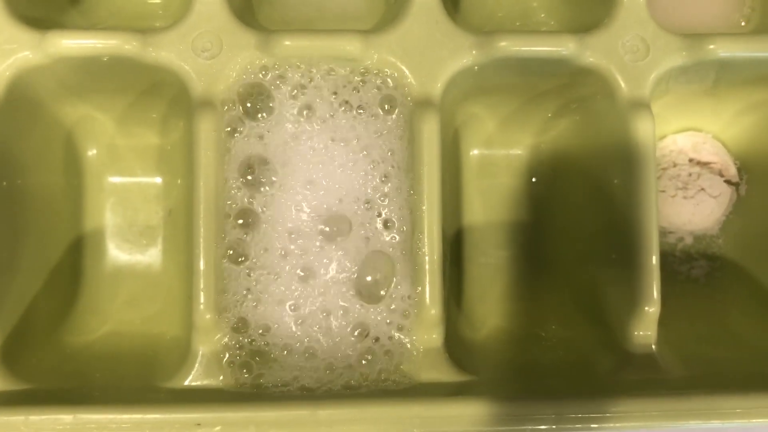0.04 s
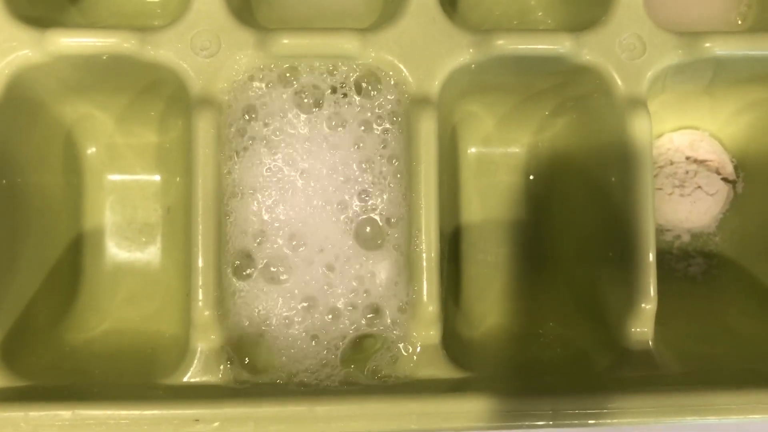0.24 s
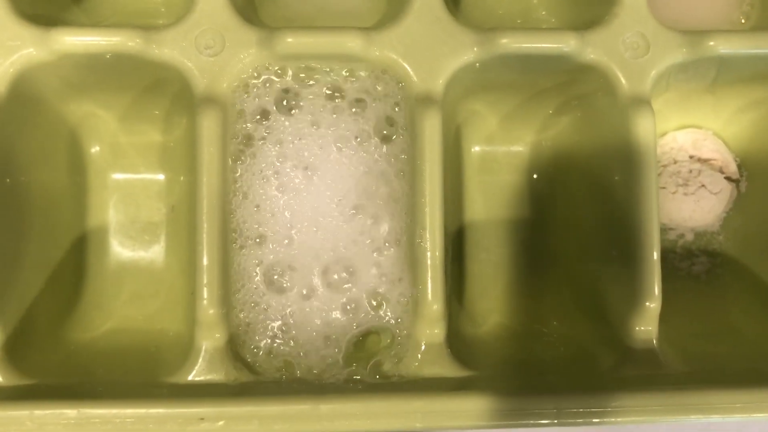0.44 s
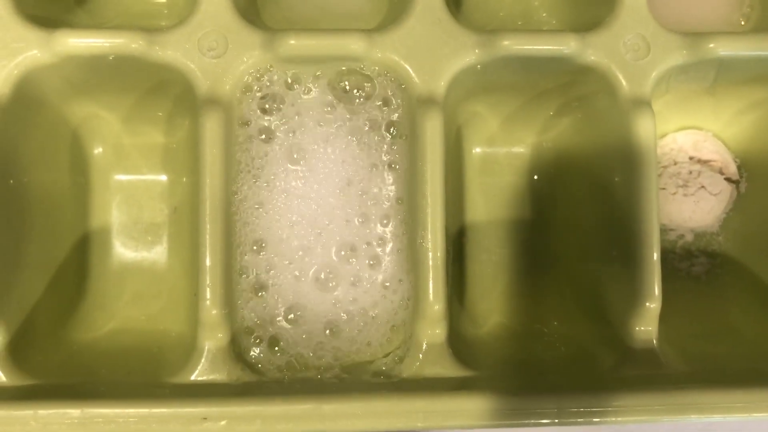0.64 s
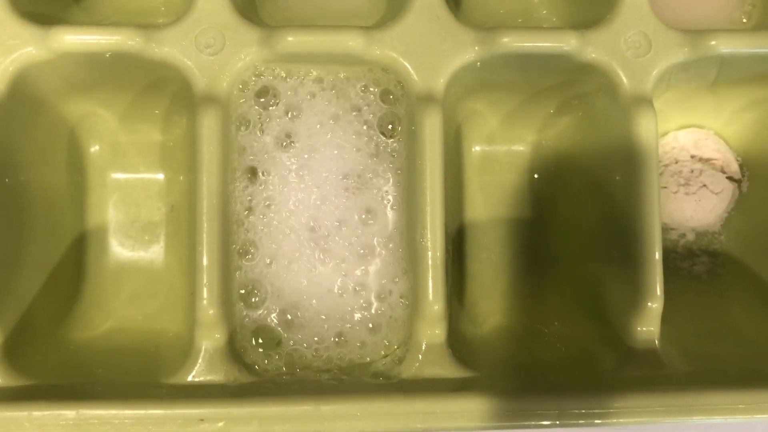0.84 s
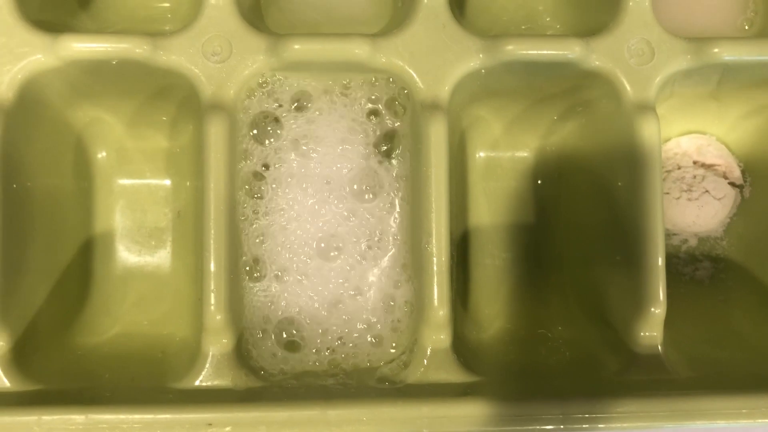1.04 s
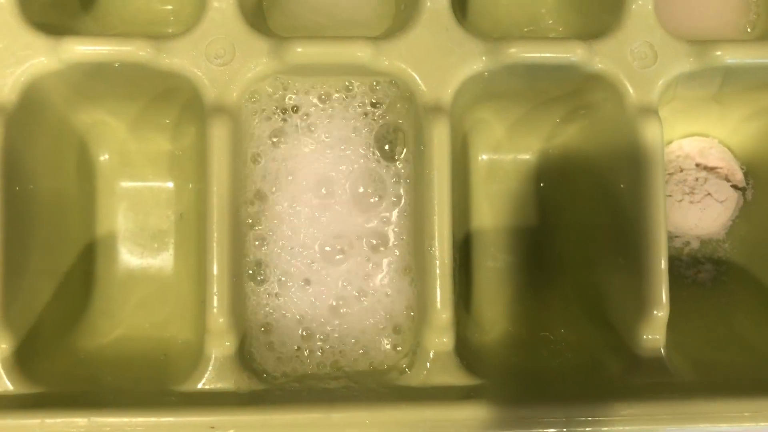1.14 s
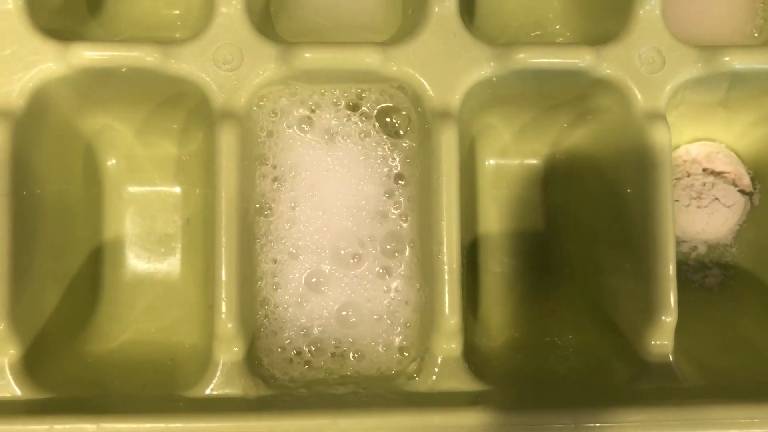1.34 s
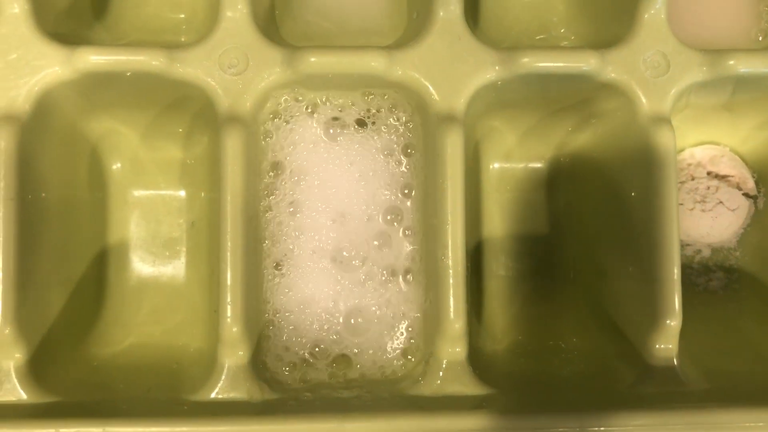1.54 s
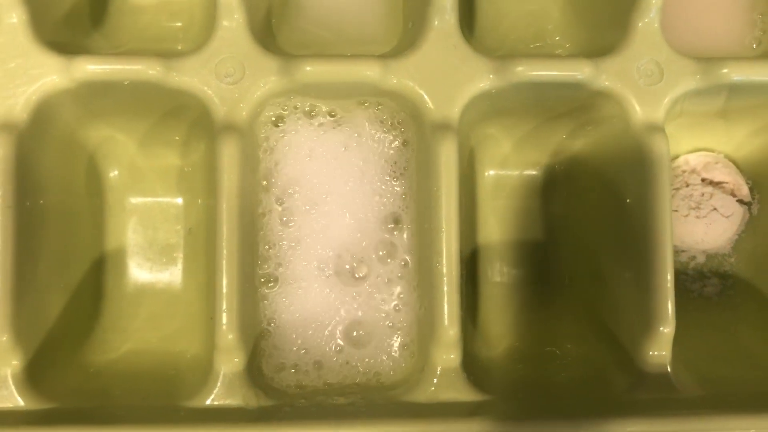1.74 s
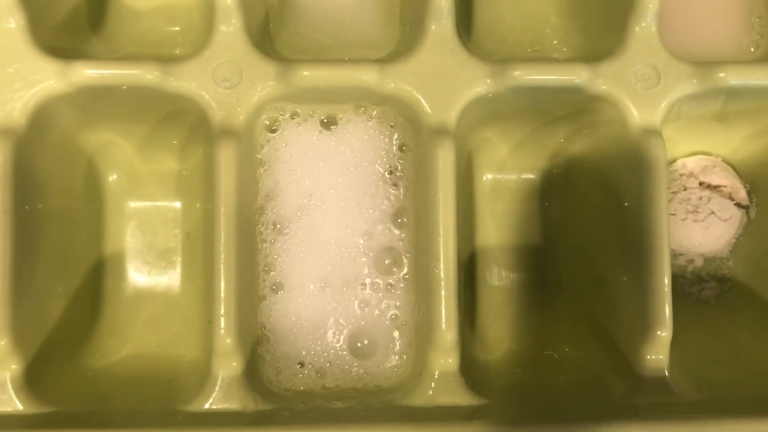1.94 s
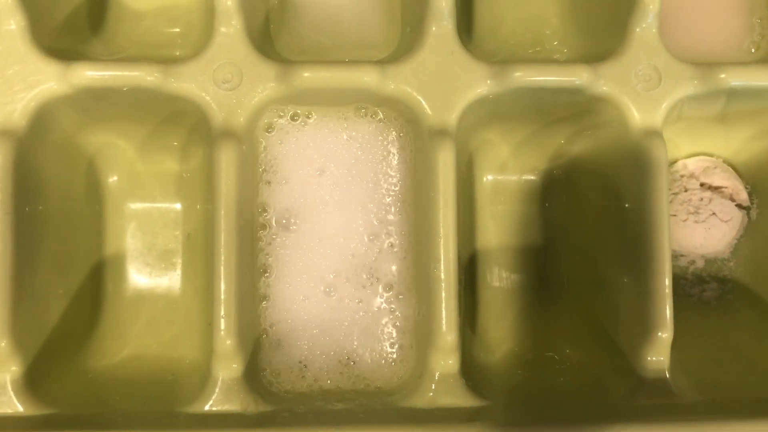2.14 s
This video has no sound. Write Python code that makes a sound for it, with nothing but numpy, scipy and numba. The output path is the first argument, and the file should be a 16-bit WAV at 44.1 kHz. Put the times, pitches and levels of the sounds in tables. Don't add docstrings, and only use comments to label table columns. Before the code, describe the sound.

Foam fizzes continuously in a small plastic tray well, tiny bubbles bursting very close to the microphone; early on a stick hits the tray sharply, then rattles softly, over faint indoor room air and hum.

```python
import sys
import numpy as np
from scipy import signal
from scipy.fft import rfft, irfft
from scipy.io import wavfile
from scipy.ndimage import uniform_filter1d
from numba import njit

SR = 44100
rng = np.random.default_rng(int(sys.argv[2]) if len(sys.argv) > 2 else 0)


def output_pcm(signal):
    pcm = np.clip(np.atleast_2d(signal).T, -1, 1) * 32767
    wavfile.write(sys.argv[1], SR, np.round(pcm).astype(np.int16))


def convert_level_to_amplitude(level_db):
    exponent = np.asarray(level_db, float) / 20
    return 10 ** exponent


N = 97020

# frequency in Hz, rms level in dB, wobble in dB.
HUM_TONES = [(56.6, -61, .2), (169, -77, 1), (274, -75, 1)]
# centre in Hz, width in Hz, rms level in dB.
HOUSING_DRONE = [(173, 31, -72), (267, 11, -72)]
# frequency in Hz, level in dB.
AIR_COLOUR = [(45, -19), (70, -3), (95, -6), (130, -1), (340, -1), (420, -7), (650, 0), (850, -10)]
# time in seconds, level in dB.
DRAUGHT_LEVEL = [
    (0, -58),
    (0.12, -65),
    (0.3, -62),
    (1.2, -65.5),
    (1.4, -81),
    (2.0, -78),
    (2.2, -61),
]
# start in seconds, peak in dB, frequency in Hz, decay T60 in seconds.
SOFT_BUMPS = [(1.274, -53, 320, .035), (1.279, -48, 195, .04), (1.285, -50, 145, .04),
              (2.0055, -44, 200, .05), (2.003, -49, 290, .05), (2.012, -46, 140, .06),
              (2.011, -49, 350, .05), (0.387, -53, 1180, .04), (1.14, -56, 550, .04), (0.336, -56, 345, .1),
              (1.535, -54, 170, .08)]
# frequency in Hz, level in dB, decay T60 in seconds.
TRAY_MODES = [(617, -7, 0.029), (744, -10, 0.018), (1085, -13, 0.026), (1536, -9, 0.017),
              (1815, -12.5, 0.016), (2167, -7.5, 0.012), (2635, -2.5, 0.01), (2790, -4, 0.014),
              (4160, -5.5, 0.012), (4570, -9.5, 0.012), (5190, -5.5, 0.0099), (5710, -9, 0.016),
              (9450, -4, 0.011), (12210, -6.5, .015)]
# frequency in Hz, level in dB, decay T60 in seconds.
HARD_STICK_MODES = [(1712, -21, .09), (2245, -21, .08), (3166, -3.5, .075), (4214, -16, .08),
                    (4420, -19, .05), (5170, -12, .1), (7228, -17, .11), (7456, -5.5, .11),
                    (9395, -16, .12), (12250, -16, .06), (13065, -5, .09), (13575, -8, .06),
                    (13745, -9, .08), (13815, -7, .09)]
# frequency in Hz, level in dB, decay T60 in seconds.
SOFT_STICK_MODES = [(1790, -5, .08), (2050, -12, .1), (2625, 0, .03), (3760, -7, .03), (4200, -6, .03),
                    (4637, 2, .05), (5030, -1, .035), (5175, -2, .055), (6100, -4, .015), (9062, -3.5, .2),
                    (13070, -20, .08), (14310, -18, .1)]
# start in seconds, ring level in dB, knock level in dB.
HARD_CONTACTS = [
    (0.2073, -21.5, -18.5),
    (0.2575, -50, -48),
]
# start in seconds, ring level in dB, knock level in dB.
SOFT_CONTACTS = [
    (0.4254, -35, -31),
    (0.4312, -47, -39),
    (0.4365, -44, -37),
    (0.4395, -52, -41),
    (0.4415, -54, -42),
    (0.451, -58, -46),
    (0.4735, -62, -44),
    (0.4758, -56, -38),
    (0.482, -59, -40),
    (0.485, -62, -41),
]
# start in seconds, peak in dB, frequency in Hz, decay T60 in seconds.
FREE_END_RINGS = [
    (0.25, -52, 3165, .12),
    (0.29, -57, 3180, .3),
    (0.233, -46, 7445, .35),
    (0.233, -47, 7478, .35),
    (0.232, -50, 5170, .2),
    (0.235, -52, 2200, .15),
    (0.228, -54, 13810, .25),
    (0.445, -56, 4635, .3),
    (0.452, -50, 1950, .1),
    (0.458, -53, 2150, .08),
]
# time in seconds, fizz level in dB, ringing of the well in dB.
FOAM_STATE = [
    (0.0, -47.5, -6.5),
    (0.451, -49.5, -4.5),
    (0.7, -48.5, -6),
    (1.1, -49, -5.5),
    (1.7, -49, -5),
    (2.2, -49.5, -1.5),
]
# frequency in Hz, level in dB.
FIZZ_COLOUR = [(600, -15), (1600, -8.5), (2800, -3.5), (4600, -0.5), (7000, 0), (10000, 0.5), (13000, -3),
               (16000, -2)]
# frequency in Hz, width in Hz, level in dB.
WELL_MODES = [(1184, 247, 13.5), (2110, 410, -4), (3540, 650, 4), (8530, 430, -11.5), (11400, 380, -9),
              (13200, 670, 1.5), (15300, 550, -5.5)]
# start in seconds, peak in dB, frequency in Hz.
LARGE_BUBBLES = [(0.647, -41, 4000), (1.073, -38, 7000), (1.22, -40, 5800), (0.5338, -39, 3910),
                 (0.7143, -39, 3770), (1.8123, -38, 6000), (1.914, -41, 3700), (1.886, -46, 1200),
                 (1.5425, -37, 4030), (1.545, -39, 3900), (1.728, -41, 3700), (2.024, -39, 6200)]


def level(x, db):
    return x * convert_level_to_amplitude(db) / np.sqrt(np.mean(x ** 2))


def band(x, hz, width_hz):
    return signal.lfilter(*signal.iirpeak(min(hz, .45 * SR), hz / width_hz, fs=SR), x)


def high_pass(x, order, hz):
    return signal.sosfilt(signal.butter(order, hz, "high", fs=SR, output="sos"), x)


def colour(x, points):
    f = np.maximum(np.arange(N // 2 + 1) * SR / N, 1)
    hz, db = np.array(points).T
    low_edge = np.minimum(f / hz[0], 1) ** 2
    return irfft(rfft(x) * low_edge * convert_level_to_amplitude(np.interp(np.log(f), np.log(hz), db)), N)


def walk(rate):
    k = int(SR / rate)
    steps = np.repeat(rng.standard_normal(N // k + 1), k)
    drift = uniform_filter1d(uniform_filter1d(steps, k), k)[:N]
    return (drift - drift.mean()) / drift.std()


def envelope(times, db):
    return convert_level_to_amplitude(np.interp(np.arange(N) / SR, times, db))


@njit
def grains(count, start, hz, t60, size, glide):
    y = np.zeros(count)
    for k in range(len(start)):
        first = int(start[k] * SR)
        n = int(t60[k] * SR) + 2
        fade = np.exp(-np.log(1000.) / n)
        rise = (1 + glide) ** (3 / n)
        phase, step, a = 0., 2 * np.pi * hz[k] / SR, size[k]
        for i in range(first, min(first + n, count)):
            y[i] += a * np.sin(phase)
            phase += step
            step = min(step * rise, 2.9)
            a *= fade
    return y


def room_air():
    air = signal.lfilter(*signal.butter(2, 1100, fs=SR), rng.standard_normal(N))
    return level(colour(air, AIR_COLOUR), -62) * convert_level_to_amplitude(0.7 * walk(1.06))


def draught():
    times, db = np.array(DRAUGHT_LEVEL).T
    murmur = band(rng.standard_normal(N), 455, width_hz=320)
    return level(murmur, 0) * envelope(times, db)


def motor():
    t = np.arange(N) / SR
    out = np.zeros(N)
    for hz, db, wobble_db in HUM_TONES:
        out += np.sqrt(2) * convert_level_to_amplitude(db + wobble_db * walk(5.5)) * np.sin(2 * np.pi * hz * t)
    for hz, width_hz, db in HOUSING_DRONE:
        out += level(band(rng.standard_normal(N), hz, width_hz), db)
    return out


def bumps():
    start, db, hz, t60 = np.array(SOFT_BUMPS).T
    return high_pass(grains(N, start, hz, t60, convert_level_to_amplitude(db), -.25), 3, 95)


def room(x):
    t = np.arange(SR // 2) / SR
    t60_s, onset_s = .25, 0.0025
    tail = rng.standard_normal(len(t)) * convert_level_to_amplitude(-60 * t / t60_s) * np.minimum(t / onset_s, 1)
    tail = signal.lfilter(*signal.butter(1, 3000, fs=SR), tail)
    return signal.fftconvolve(x, tail / np.sqrt(np.sum(tail ** 2)))[:N] * convert_level_to_amplitude(-15)


def stick_ring(t, modes, db):
    hz, mode_db, t60 = np.array(modes).T
    ring = grains(len(t), .0006 * rng.random(len(hz)), hz, t60, convert_level_to_amplitude(mode_db + db), 0.)
    settle = np.exp(np.clip((.023 - t) / 0.0036, -50, 50))
    return ring * convert_level_to_amplitude(-15 / (1 + settle))


def tray_knock(t, db, scatter_db, detune, dull_hz, thin_hz):
    hz, mode_db, t60 = np.array(TRAY_MODES).T
    chance, delay, pitch = rng.random((len(hz), 3)).T
    dull = 1 / (1 + (hz / dull_hz) ** 4) / (1 + (thin_hz / hz) ** 4)
    sign = (-1.) ** np.arange(len(hz))
    size = sign * dull * convert_level_to_amplitude(mode_db + db + scatter_db * (2 * chance - 1.5))
    knock = grains(len(t), .0003 * delay, hz * (1 + detune * (pitch - .5)), t60, size, 0.)
    crack_s = 0.0026
    crack = rng.standard_normal(len(t)) * t / crack_s * np.exp(-2 * t / crack_s) * 5
    return knock + convert_level_to_amplitude(db - 2.5) * band(crack, 4060, width_hz=3500)


def taps(contacts, modes, low_hz, **blow):
    out, t = np.zeros(N), np.arange(SR // 4) / SR
    for start, ring_db, knock_db in contacts:
        i = int(start * SR)
        out[i:i + len(t)] += stick_ring(t, modes, ring_db) + tray_knock(t, knock_db, **blow)
    return high_pass(out, 2, low_hz)


def stick():
    hard = taps(HARD_CONTACTS, HARD_STICK_MODES, low_hz=1200,
                scatter_db=1, detune=.01, dull_hz=14200, thin_hz=400)
    soft = taps(SOFT_CONTACTS, SOFT_STICK_MODES, low_hz=1700,
                scatter_db=3, detune=.08, dull_hz=6000, thin_hz=1500)
    return high_pass(hard + soft, 4, 510)


def free_end():
    start, db, hz, t60 = np.array(FREE_END_RINGS).T
    return grains(N, start, hz, t60, convert_level_to_amplitude(db), 0.)


def bubble_swarm():
    bursts_per_s, spread_db, loudest_db = 9000, 2.5, 15.5
    gap, pitch, strength = rng.random((30000, 3)).T
    start = np.cumsum(-np.log(1 - gap)) / bursts_per_s
    hz = 1184 + (17700 - 1184) * pitch
    size = convert_level_to_amplitude(np.minimum(-spread_db * np.log(1 - strength), loudest_db)) * np.sqrt(hz)
    bursts = level(grains(N, start, hz, 2 * 3.24 / hz, size, 0.2), 0)
    mist = convert_level_to_amplitude(-1.4) * rng.standard_normal(N)
    swarm_db, flicker_db = .15 * walk(6.52), 0.62 * walk(60.32)
    return (bursts + mist) * convert_level_to_amplitude(swarm_db + flicker_db)


def well_ring(x):
    return sum(convert_level_to_amplitude(db + 0.36 * walk(11.44)) * band(x, hz, width_hz) for hz, width_hz, db in WELL_MODES)


def large_bubbles():
    start, db, hz = np.array(LARGE_BUBBLES).T
    return grains(N, start, hz, 22 / hz, convert_level_to_amplitude(db), 0.077)


def fizz():
    times, fizz_db, well_db = np.array(FOAM_STATE).T
    swarm = bubble_swarm()
    direct = level(colour(swarm, FIZZ_COLOUR), 0)
    ringing = level(colour(well_ring(swarm), FIZZ_COLOUR), 0) * envelope(times, well_db)
    return (direct + ringing) * envelope(times, fizz_db) + large_bubbles()


def scene():
    background = room_air() + draught() + motor() + bumps()
    tapping = stick()
    return (background + tapping + room(tapping) + free_end() + fizz())[None]


def top_cut(x):
    return signal.sosfilt(signal.butter(12, 16660, fs=SR, output="sos"), x)


def record(dry):
    below_top = np.arange(N // 2 + 1) * SR / N < 15900
    mix = irfft(rfft(dry) * below_top, N)
    return top_cut(mix)


dry = scene()
out = record(dry)
output_pcm(out)
```